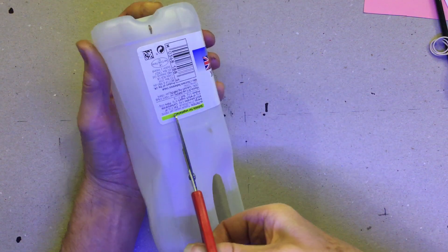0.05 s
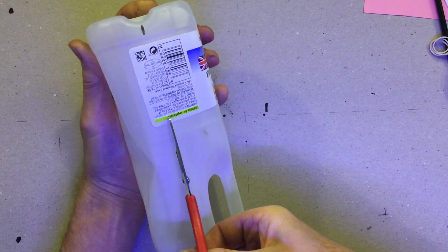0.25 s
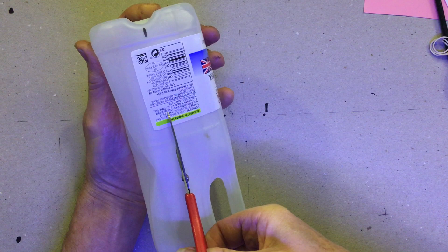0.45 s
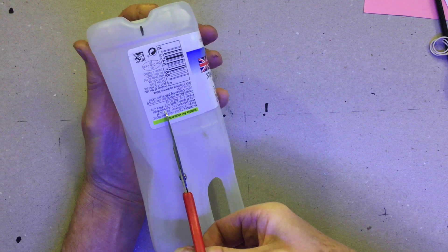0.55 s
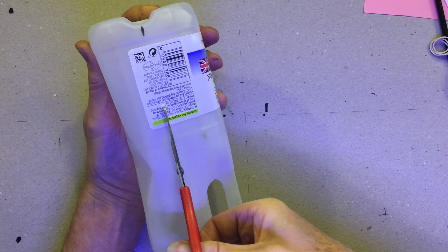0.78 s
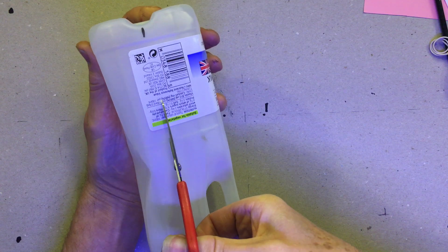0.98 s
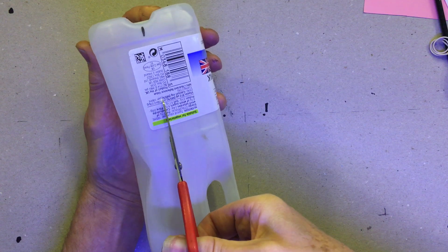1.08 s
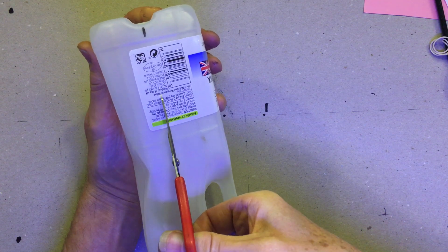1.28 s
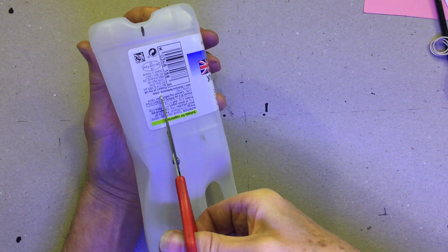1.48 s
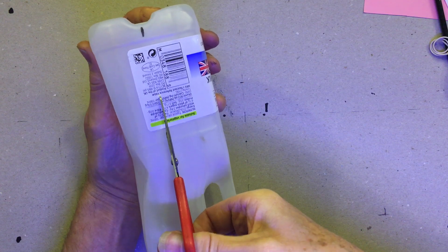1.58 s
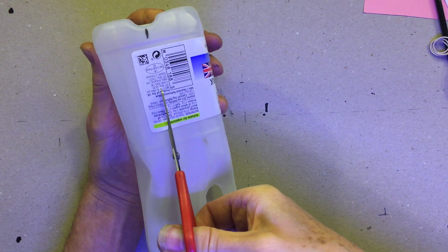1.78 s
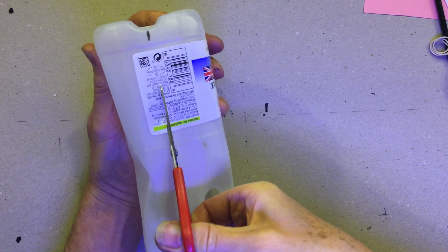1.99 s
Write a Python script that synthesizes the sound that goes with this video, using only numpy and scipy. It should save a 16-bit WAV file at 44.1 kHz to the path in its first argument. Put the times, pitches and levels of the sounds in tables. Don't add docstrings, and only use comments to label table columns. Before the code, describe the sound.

Thin plastic bottle being cut with scissors: soft crunches, dull hollow knocks, ticks and sharp snaps

```python
import sys
import numpy as np
from scipy import signal
from scipy.io import wavfile

SR = 44100
rng = np.random.default_rng(int(sys.argv[2]) if len(sys.argv) > 2 else 0)


def dump_mix(stems):
    frames = np.atleast_2d(stems).T
    limited = np.clip(frames, -1, 1)
    pcm = np.round(limited * 32767).astype(np.int16)
    wavfile.write(sys.argv[1], SR, pcm)


def nominal_scale(level):
    x = np.asarray(level, float) / 20
    return 10 ** x


N = 90404

# start in seconds, rise in seconds, hold in seconds, level in dB, brightness in dB.
STROKES = [(0.0, 0.00063, 0.035, -63, 4), (0.035, 0.0079, 0.049, -64, 3.5), (0.106, 0.019, 0.058, -67, 0),
           (0.176, 0.021, 0.12, -69, 1), (0.476, 0.018, 0.056, -66.5, 6.5),
           (0.659, 0.0065, 0.015, -61.5, 0), (0.681, 0.0046, 0.021, -62, 6), (0.76, 0.0034, .012, -68, -7),
           (0.819, 0.009, 0.0063, -67, 5), (0.829, 0.01, 0.039, -69.5, 7), (0.979, 0.004, 0.032, -60.5, 1),
           (1.102, 0.032, 0.021, -72.5, 2), (1.144, 0.0027, 0.025, -67.5, 7.5),
           (1.323, 0.0018, 0.02, -61, 2), (1.349, 0.0032, .015, -68, -1), (1.377, 0.0024, 0.008, -60, -3),
           (1.506, .001, .004, -59.5, 6.5), (1.513, 0.0051, 0.038, -62.5, 5.5),
           (1.679, 0.0085, 0.033, -57.5, 1.5), (1.836, 0.0044, 0.037, -65.5, 7),
           (1.889, 0.012, 0.018, -60.5, 6), (2.034, 0.018, .02, -51, -2)]
# frequency in Hz, density in dB per Hz.
CRUNCH_COLOUR = [(120, -49.5), (200, -2), (353, 7.5), (800, -6), (1700, -17.5), (3000, -12.5),
                 (5500, -15.5), (9000, -27), (16000, -35)]
# pitch in Hz, width in Hz, gain in dB.
BOTTLE_RESONANCES = [(350, 39, 5), (536, 290, -2.5), (1032, 49, 4), (1660, 367, 12.5), (2475, 290, 5),
                     (2600, 31, -12.5), (3670, 103, -20)]
# start in seconds, hold in seconds, pitch in Hz, level in dB.
RASPS = [(0.335, 0.0075, 3970, -43), (0.339, 0.0085, 4700, -43), (0.34, .008, 4650, -45),
         (0.3385, 0.0054, 2820, -37.5), (0.338, 0.0033, 3520, -38), (0.34, 0.022, 1660, -43),
         (0.345, 0.023, 5860, -49.5), (0.374, 0.031, 706, -50), (0.088, .006, 1690, -65.5),
         (0.34, 0.026, 1194, -47.5), (0.497, 0.014, 375, -57), (0.498, 0.0071, 1700, -63.5),
         (0.5, 0.038, 3450, -72.5), (0.53, 0.017, 350, -63), (0.535, .016, 1580, -84),
         (0.493, 0.076, 4800, -77.5), (0.671, 0.042, 1620, -67), (0.98, 0.023, 1695, -66),
         (1.144, 0.0099, 2600, -79), (1.324, 0.014, 1654, -62), (1.325, 0.017, 2740, -62.5),
         (1.331, 0.011, 2250, -66), (1.378, 0.0044, 890, -63), (1.379, 0.014, 1620, -67.5),
         (1.374, 0.0079, 4040, -73), (1.502, 0.028, 1610, -72), (1.512, .045, 2500, -72),
         (1.679, 0.014, 1587, -68.5), (1.68, .012, 2660, -66), (1.693, 0.021, 2750, -64.5),
         (1.683, 0.026, 2150, -68.5), (1.692, .02, 1830, -67), (1.694, 0.029, 1140, -68),
         (1.732, 0.0057, 1160, -44), (1.7308, 0.0044, 2770, -45), (1.734, 0.0076, 3230, -46),
         (1.733, 0.0054, 4830, -46.5), (1.734, 0.013, 5480, -52), (1.743, 0.012, 4020, -53.5),
         (1.847, 0.046, 3970, -71.5), (1.844, 0.047, 383, -63), (1.904, 0.012, 2380, -74),
         (2.033, 0.023, 1560, -68), (2.035, .02, 2950, -63), (2.039, 0.027, 2230, -64)]
# start in seconds, length in seconds, pitch in Hz, level in dB.
SQUEAKS = [
    (0.044, .012, 2900, -64),
    (0.087, .008, 2700, -64),
    (0.321, .009, 4150, -70),
    (0.687, .025, 2761, -53),
    (0.86, .008, 3550, -65),
    (0.998, .014, 2765, -57),
    (1.692, .012, 2880, -64),
]
# time in seconds, peak in dB.
TICKS = [(0.3377, -55), (0.501, -53), (0.763, -61), (0.828, -65), (0.984, -53.5), (1.143, -62),
         (1.159, -55), (1.2, -43), (1.3278, -53.5), (1.3779, -64), (1.507, -48), (1.679, -58),
         (1.731, -20.5), (1.846, -68), (1.907, -71), (2.036, -65)]
# time in seconds, level in dB.
SNAPS = [
    (0.338, -34),
    (1.1988, -57),
    (1.7295, -45.5),
]
# frequency in Hz, density in dB per Hz.
SNAP_COLOURS = [
    [(200, -16), (480, -8.5), (950, -10), (1400, -4), (2100, -6.5), (3600, 0.5), (8000, -18.5),
     (16000, -22.5)],
    [(100, -17), (350, 0.5), (1000, -3.5), (3000, -13), (7000, -17.5), (16000, -61)],
    [(100, -29), (300, -11), (750, -7.5), (1200, 2), (3000, -6.5), (9000, -11.5), (10200, -35),
     (16000, -25)],
]
# pitch in Hz, level in dB, 60 dB decay in seconds.
SHELL_MODES = [(352, 4, 0.052), (532, 4, 0.033), (653, 1, 0.035), (766, -11.5, 0.061), (1209, -2, 0.013),
               (2543, 0.5, 0.01), (3686, -5, 0.0127)]
SHELL_DB = [-27, -42, -39]
# pitch in Hz, level in dB, 60 dB decay in seconds.
HOLLOW_MODES = [(356, -1.5, .16), (535, 0, 0.11), (578.5, -5, 0.2), (664, -2, 0.21), (707, -9, .2),
                (790, -6, 0.23), (2700, -8, .06), (3740, -6, 0.042)]
HOLLOW_DB = [-2.5, -7.5, -8]
# time in seconds, peak in dB, pitch in Hz.
KNOCKS = [(0.039, -35, 294), (0.046, -42.5, 296), (0.0595, -41, 430), (0.089, -35, 302.4),
          (0.177, -46, 394), (0.2067, -27.5, 336), (0.211, -29, 251), (0.226, -35, 199),
          (0.235, -40.5, 382), (0.244, -43, 198), (0.154, -47.5, 350), (0.341, -22, 470),
          (0.3471, -17.5, 507), (0.502, -48.5, 404), (0.514, -46, 350), (0.551, -54, 341), (0.69, -44, 350),
          (0.765, -38, 410), (0.79, -45.5, 208), (1.159, -44, 382), (1.3452, -46.5, 201),
          (1.38, -41.5, 288), (1.52, -42, 354), (1.699, -38.5, 420), (1.726, -27, 296), (1.758, -40.5, 160),
          (1.909, -39.5, 401)]
# time in seconds, peak in dB, pitch in Hz.
THUDS = [(0.041, -51.5, 94), (0.088, -46.5, 99), (0.215, -50, 128), (0.355, -47, 109), (0.681, -49.5, 95),
         (0.79, -52.5, 130), (0.989, -49, 101), (1.24, -55, 128), (1.336, -50, 116), (1.692, -48.5, 119),
         (1.738, -39.5, 123), (1.751, -42.5, 84)]
# frequency in Hz, 60 dB decay in seconds.
ROOM_T60 = [(100, 0.093), (500, 0.18), (2000, 0.17), (5000, 0.19), (9000, 0.18), (15000, 0.099)]
# frequency in Hz, density in dB per Hz.
HISS_COLOUR = [(59, -29), (100, 2.5), (250, -8.5), (480, -16), (1500, -26.5), (4000, -28), (9000, -32),
               (16000, -35)]
# pitch in Hz, width in Hz, level in dB.
RUMBLE = [(91, 44, -70), (130.8, 12, -81)]

BAND_EDGES_HZ = 28 * 2 ** np.arange(0, 9.4, 1 / 3)
SLIPS_PER_S, SLIP_SPREAD_DB, PATCHY_DB = 3000, 3.5, 2
BITE, RISE_POWER, BRIGHT_HZ = 0.5, 1.4, 2963
RASP_ATTACK_S, RASP_T60_S = 0.00078, 0.12
SQUEAK_WOBBLE, SQUEAK_OCTAVE_DB, SQUEAK_ROOM_DB = 0.006, -22, -6
TICK_BAND_HZ, TICK_ROOM_DB = [1000, 5500], 5
TEAR_S, TEAR_LOSS_DB = 0.0046, 16
KNOCK_CYCLES, KNOCK_ROOM_DB = 3.2, -10
THUD_DB, THUD_T60_S = 0.5, 0.12
HISS_DB, RUMBLE_SWING_DB = -72.5, 2.5
DIRECT_DB, DIRECT_S, BUILD_S, BUILD_CYCLES = 4.5, 0.0012, 0.0018, 0.24
LOW_CUT_HZ, TOP_CUT_HZ = 63, 16900


def crunch():
    t = np.arange(N) / SR
    level, bright = np.zeros(N), np.zeros(N)
    for start, rise, hold, db, bright_db in STROKES:
        ramp = np.clip((t - start) / rise, 0, 1) ** RISE_POWER
        cutting = (t >= start) * (t < start + rise + hold)
        stroke = cutting * nominal_scale(db) * (BITE + (1 - BITE) * ramp)
        level = level + stroke
        bright = bright + stroke * nominal_scale(bright_db)
    hits = slip_sizes(N) * (rng.random(N) < SLIPS_PER_S / SR)
    slips = rms_one(hits) * nominal_scale(PATCHY_DB * drift(47))
    out = butter(slips * level, 1, BRIGHT_HZ, "low")
    out = out + butter(slips * bright, 1, BRIGHT_HZ, "high")
    for hz, width, db in BOTTLE_RESONANCES:
        out = out + resonate(slips * level * nominal_scale(db + PATCHY_DB * drift(10.4)), hz, width)
    return room(out, CRUNCH_COLOUR)


def rasps():
    t = np.arange(SR // 4) / SR
    out = np.zeros(N + SR)
    for start, hold, hz, db in RASPS:
        width = 80 + 0.13 * hz
        slips = slip_sizes(2 * len(t))
        tone = resonate(resonate(slips, hz, width), hz, width)[len(t):]
        tone = tone / np.sqrt(np.mean(tone[:int((hold + 0.01) * SR)] ** 2))
        fall_db = 60 * np.maximum(t - hold, 0) / RASP_T60_S
        shape = (1 - np.exp(-t / RASP_ATTACK_S)) * nominal_scale(db - fall_db)
        first = int(start * SR)
        out[first:first + len(t)] += tone * shape
    return out[:N]


def squeaks():
    t = np.arange(N) / SR
    wavering_t = np.cumsum(1 + SQUEAK_WOBBLE * drift(80)) / SR
    roughness = nominal_scale(3.1 * drift(170))
    out = 0
    for start, length, hz, db in SQUEAKS:
        swell = np.sin(np.pi * np.clip((t - start) / length, 0, 1)) ** 0.5
        phase = 2 * np.pi * hz * wavering_t
        tone = np.sin(phase) + nominal_scale(SQUEAK_OCTAVE_DB) * np.sin(2 * phase)
        out = out + nominal_scale(db) * swell * roughness * tone
    return out + nominal_scale(SQUEAK_ROOM_DB) * room(out, [(1000, -30), (2000, 6.0), (16000, 10.5)])


def ticks():
    s, db = np.transpose(TICKS)
    crack = butter(clicks(s, 2 * nominal_scale(db)) + 1e-18, 1, TICK_BAND_HZ, "band")
    return crack + nominal_scale(TICK_ROOM_DB) * room(crack, [(200, -1.0), (3000, -8.5), (16000, -7.5)])


def snaps():
    out = 0
    for (s, db), colour, shell_db, hollow_db in zip(SNAPS, SNAP_COLOURS, SHELL_DB, HOLLOW_DB):
        late = np.append(0, rng.exponential(TEAR_S, 11))
        tear_gain = nominal_scale(db + 31.5 - TEAR_LOSS_DB * (late > 0))
        tear = clicks(s + late, tear_gain * rng.choice([-1, 1], 12))
        blow = clicks([s], nominal_scale(db + 34.0))
        shell = sum(nominal_scale(shell_db + mode_db) * ring(blow, hz, t60) for hz, mode_db, t60 in SHELL_MODES)
        hollow = 0
        for hz, mode_db, t60 in HOLLOW_MODES:
            push = clicks([s + 1 / hz], nominal_scale(db + hollow_db + mode_db))
            hollow = hollow + ring(push, hz, t60)
        out = out + room(tear + shell, colour) + hollow
    return out


def knocks():
    body = 0
    for s, db, hz in KNOCKS:
        contact = clicks([s], nominal_scale(db))
        t60 = KNOCK_CYCLES / hz
        body = body + ring(contact, hz, t60) + 0.46 * ring(-contact, hz * 1.81, t60)
    body = butter(body, 2, 950, "low")
    thud = sum(ring(clicks([s], nominal_scale(db + THUD_DB)), hz, THUD_T60_S) for s, db, hz in THUDS)
    thud = butter(thud, 2, 200, "low")
    return body + thud + nominal_scale(KNOCK_ROOM_DB) * room(body, [(60, -31.5), (200, 8.0), (16000, -0.5)])


def hush():
    noise, centres = bands(N)
    hiss = rms_one(nominal_scale(at_hz(HISS_COLOUR, centres)) @ noise)
    out = nominal_scale(HISS_DB + 2.5 * drift(5.6)) * hiss
    for hz, width, db in RUMBLE:
        murmur = resonate(resonate(rng.standard_normal(N), hz, width), hz, width)
        out = out + nominal_scale(db + RUMBLE_SWING_DB * drift(3.8)) * rms_one(murmur)
    return out


def room(x, colour):
    noise, hz = bands(SR // 3)
    t = np.arange(noise.shape[1]) / SR
    shape = nominal_scale(DIRECT_DB) * np.exp(-t / DIRECT_S) + 1 - np.exp(-t / BUILD_S)
    build = 1 - np.exp(-t * hz[:, None] / BUILD_CYCLES)
    decay = nominal_scale(-60 * t / at_hz(ROOM_T60, hz)[:, None])
    answer = shape * (nominal_scale(at_hz(colour, hz)) @ (noise * build * decay))
    return signal.fftconvolve(x, answer / np.sqrt(np.sum(answer ** 2)))[:N]


def resonate(x, hz, width):
    r = np.exp(-np.pi * width / SR)
    poles = [1, -2 * r * np.cos(2 * np.pi * hz / SR), r * r]
    return signal.lfilter([(1 - r * r) / 2, 0, (r * r - 1) / 2], poles, x + 1e-18)


def ring(x, hz, t60):
    r, w = nominal_scale(-60 / (t60 * SR)), 2 * np.pi * hz / SR
    return signal.lfilter([0, np.sin(w)], [1, -2 * r * np.cos(w), r * r], x + 1e-18)


def clicks(s, gain):
    out = np.zeros(N)
    np.add.at(out, np.clip((np.asarray(s) * SR).astype(int), 0, N - 1), gain)
    return out


def slip_sizes(count):
    spread = np.minimum(rng.exponential(1, count), 4)
    return nominal_scale(SLIP_SPREAD_DB * spread) * rng.choice([-1, 1], count)


def drift(rate):
    r = np.exp(-2 * np.pi * rate / SR)
    return rms_one(signal.lfilter([1], [1, -2 * r, r * r], rng.standard_normal(N + SR))[SR:])


def bands(size):
    white = rng.standard_normal((2, size + 4000))
    pairs = zip(BAND_EDGES_HZ, BAND_EDGES_HZ[1:])
    rows = [butter(white[k % 2], 2, [lo, hi], "band")[4000:] for k, (lo, hi) in enumerate(pairs)]
    return np.array(rows), np.sqrt(BAND_EDGES_HZ[1:] * BAND_EDGES_HZ[:-1])


def butter(x, order, hz, kind):
    return signal.sosfilt(signal.butter(order, hz, kind, fs=SR, output="sos"), x)


def at_hz(points, hz):
    table_hz, values = np.transpose(points)
    return np.interp(np.log(hz), np.log(table_hz), values)


def rms_one(x):
    return x / np.sqrt(np.mean(x ** 2) + 1e-20)


def scene():
    return (crunch() + rasps() + squeaks() + ticks() + snaps() + knocks() + hush())[None]


def low_pass(x):
    return signal.sosfilt(signal.butter(12, 16460, fs=SR, output="sos"), x)


def record(dry):
    mix = butter(dry, 4, LOW_CUT_HZ, "high")
    mix = signal.sosfilt(signal.cheby2(12, 60, TOP_CUT_HZ, fs=SR, output="sos"), mix)
    return low_pass(mix)


dry = scene()
out = record(dry)
dump_mix(out)
```